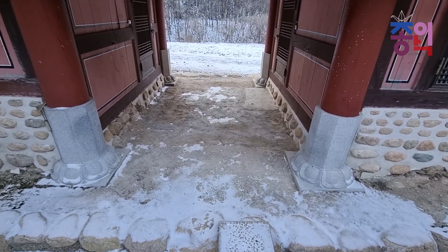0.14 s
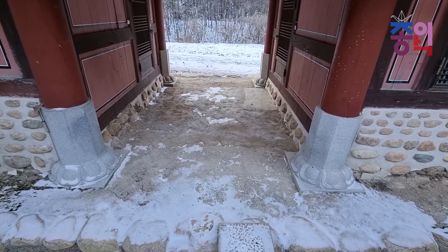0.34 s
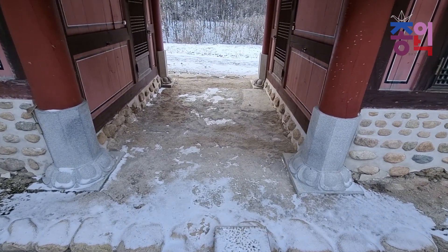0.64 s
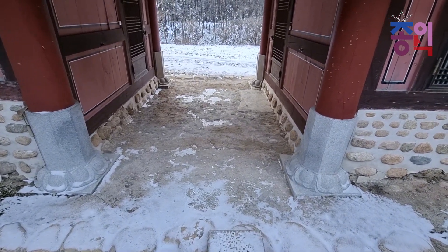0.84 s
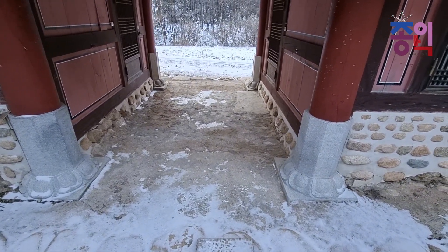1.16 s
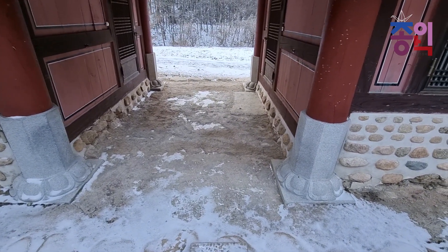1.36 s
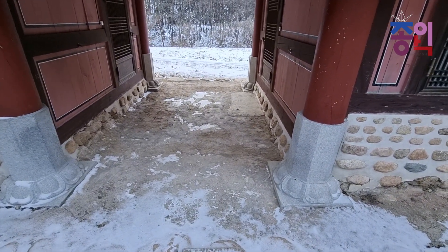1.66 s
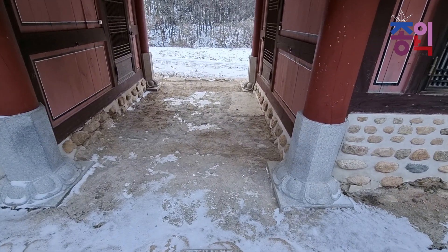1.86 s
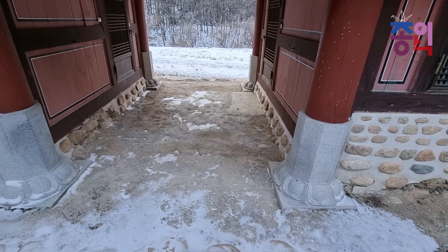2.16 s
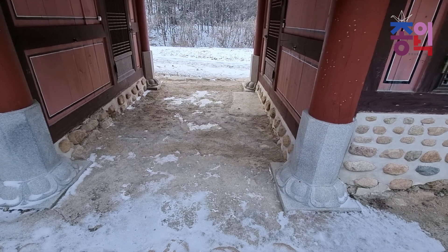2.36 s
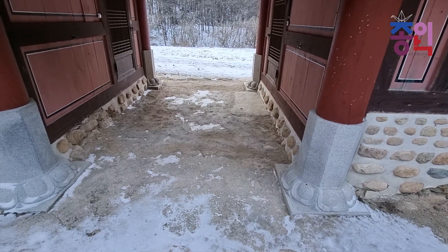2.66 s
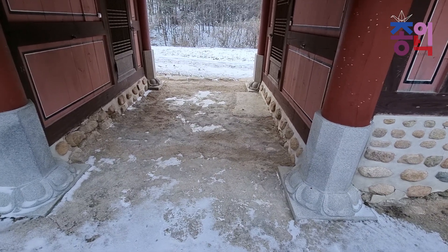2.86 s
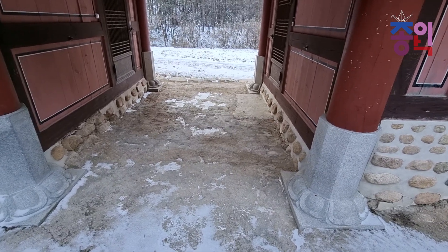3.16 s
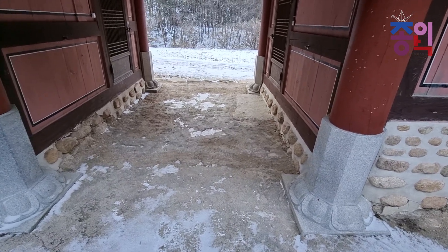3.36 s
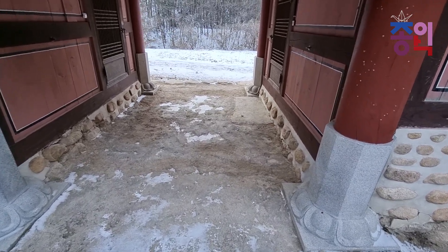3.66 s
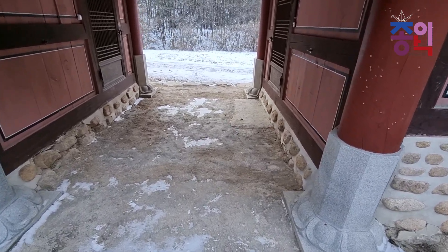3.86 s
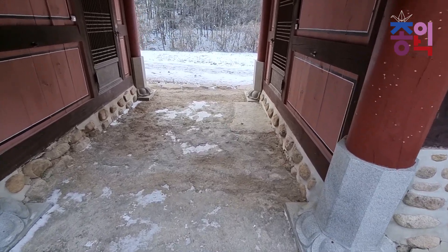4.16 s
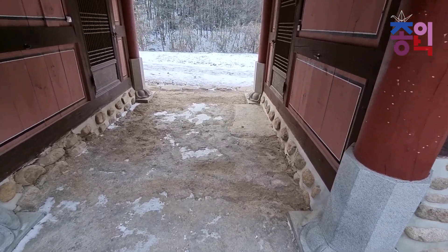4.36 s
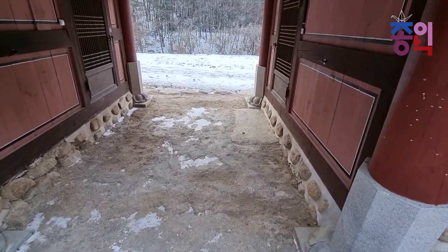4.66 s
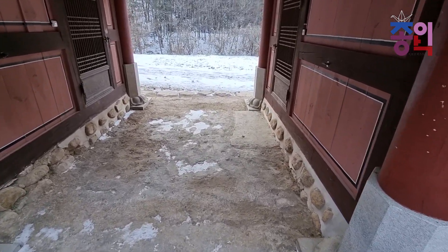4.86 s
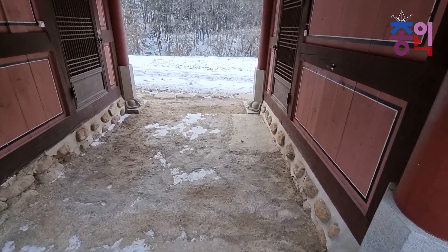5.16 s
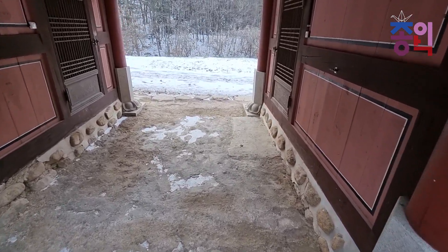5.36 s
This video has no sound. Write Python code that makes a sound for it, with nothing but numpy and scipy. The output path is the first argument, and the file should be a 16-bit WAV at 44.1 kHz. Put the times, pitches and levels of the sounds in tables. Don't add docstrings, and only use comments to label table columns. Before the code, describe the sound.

Slow boots crunch and crackle on frozen snow, then stamp harder onto hollow-sounding stone, with gritty scuffs and icy ticks.

```python
import sys
import numpy as np
from scipy import signal
from scipy.fft import rfft, irfft, next_fast_len
from scipy.io import wavfile
from scipy.ndimage import uniform_filter1d

SR = 44100
rng = np.random.default_rng(int(sys.argv[2]) if len(sys.argv) > 2 else 0)


def volts_from_db(level):
    exponent = np.asarray(level, float) / 20
    return 10 ** exponent


def wrap_up_sound(samples):
    columns = np.atleast_2d(samples).T
    tamed = np.clip(columns, -1, 1)
    steps = np.round(tamed * 32767).astype(np.int16)
    wavfile.write(sys.argv[1], SR, steps)


N = 242991


def evened(x):
    return x / np.sqrt(np.mean(x ** 2) + 1e-20)


def read(points, hz):
    f, value = np.transpose(points)
    return np.interp(np.log(hz + 1), np.log(f + 1), value)


def add(mix, s, sound):
    part = mix[:, max(round(s * SR), 0):][:, :sound.shape[1]]
    part += sound[:, :part.shape[1]]


def any_phase():
    return 2 * np.pi * rng.random()


def either_side(width):
    return width * (rng.random() - 0.5)


# f/Hz, side minus mid level/dB
STEREO_WIDTH = [(60, -8), (150, -26), (380, -8), (950, 2.5), (2380, -3), (5980, 2.5), (15000, -1)]


def noise(spectrum, size):
    long = next_fast_len(size)
    hz = np.fft.rfftfreq(long, 1 / SR)
    mid, side = rfft(rng.standard_normal((2, long))) * volts_from_db(read(spectrum, hz)) * (hz < 15900)
    side = side * volts_from_db(read(STEREO_WIDTH, hz))
    pair = irfft(np.array([mid + side, mid - side]), long)[:, :size]
    return pair / np.sqrt(np.mean(pair.mean(0) ** 2))


def snap(hz, cycles, lean, phase):
    spread = cycles / hz / 4
    t = np.arange(0, 7 * spread, 1 / SR) - 2.558 * spread
    bell = np.exp(-0.5 * (t / spread / np.where(t > 0, 1.4, 1)) ** 2)
    shift = lean * min(hz / 600, 1) * np.array([[1], [-1]])
    wave = bell * np.cos(2 * np.pi * hz * t + phase + shift)
    return wave - bell * wave.sum(axis=1, keepdims=True) / bell.sum()


def flutter(per_s, spread_db, t60):
    happens = rng.random(N) < per_s / SR
    size = volts_from_db(spread_db * np.minimum(rng.exponential(1, N), 4)) * happens
    power = signal.lfilter([1], [1, -volts_from_db(-120 / t60 / SR)], size ** 2)
    return evened(np.sqrt(power))


def control(rows, offset, rise_db, fall_db, rest_db):
    s, hold, db, extra_db = np.transpose(rows)[:, :, None]
    t = np.arange(0, N + 64, 64) / SR
    early = np.maximum(s - t, 0)
    late = np.maximum(t - s - hold, 0)
    level_db = db + offset * extra_db - rise_db * early - fall_db * late
    power = (volts_from_db(level_db) ** 2).sum(0) + volts_from_db(rest_db) ** 2
    return np.interp(np.arange(N) / SR, t, np.sqrt(power))


def patchy(x, spread_db, size):
    z = signal.stft(x, nperseg=128)[2]
    field = uniform_filter1d(rng.standard_normal(z.shape[1:]), size=2, axis=0)
    field = uniform_filter1d(field, size=size, axis=1)
    out = signal.istft(z * volts_from_db(spread_db * evened(field)), nperseg=128)[1][:, :N]
    return out * np.sqrt(np.mean(x ** 2) / np.mean(out ** 2))


def grains(rows, cycles, trim_db, echo_db):
    out = np.zeros((2, N))
    for s, db, hz in rows:
        add(out, s, volts_from_db(db + trim_db) * snap(hz, cycles, either_side(2.35), any_phase()))
        for _ in range(3):
            after = snap(hz * 1.8 ** either_side(1), cycles, either_side(1.4), any_phase())
            add(out, s + 0.008 * rng.random(), volts_from_db(db + echo_db) * after)
    return out


def rough_ring(turns, smooth):
    wobble = rng.standard_normal((2, 2, len(turns)))
    wobble = uniform_filter1d(uniform_filter1d(wobble, smooth), smooth)
    return evened(wobble[0] * np.cos(turns) + wobble[1] * np.sin(turns))


# f/Hz, level/dB per Hz
AIR_COLOUR = [(20, 8), (70, 8), (256, -22), (317, 17.5), (451, -3), (591, -13), (887, -14), (1230, 0),
              (4610, -8.5), (6560, -22), (8360, -41), (13600, -39), (16000, -34)]


def air():
    return volts_from_db(-70) * noise(AIR_COLOUR, N)


# f/Hz, T60/s
WALL_DECAY = [(150, 0.44), (600, 0.22), (2000, 0.18), (8000, 0.25)]


def walls(x):
    taps = np.zeros((2, SR // 2))
    at = np.arange(200, SR // 2 - 20, 20) + rng.integers(0, 20, (2, (SR // 2 - 201) // 20))
    np.put_along_axis(taps, at, rng.choice([-1., 1.], at.shape), 1)
    hz, t, z = signal.stft(taps, SR, nperseg=256)
    tail = signal.istft(z * volts_from_db(-60 * t / read(WALL_DECAY, hz)[:, None]), SR, nperseg=256)[1]
    x = signal.lfilter(*signal.butter(2, 280, "high", fs=SR), x)
    return signal.fftconvolve(x.mean(0)[None], tail / np.linalg.norm(tail[0]), axes=1)[:, :N]


# f/Hz, level/dB per Hz
RUMBLE_COLOUR = [(25, -52), (70, 3), (98, 8.5), (119, -1), (140, 7.5), (180, -19), (310, -120)]
# t/s of full load, hold/s, crunch level/dB, heft level/dB re crunch
LOADS = [(0.0, 0.017, -44.5, -6.5), (0.2, 0.047, -49, -16.5), (0.44, 0.0082, -60, 2),
         (0.6, 0.14, -64.5, -7), (0.79, 0.16, -48, -18), (0.93, 0.27, -48.5, -10.5),
         (1.24, 0.33, -48.5, -12.5), (1.62, 0.088, -62.5, -9), (1.9, 0.024, -68, 1), (2.04, 0.19, -72, -9),
         (2.23, 0.16, -57.5, -27), (2.51, 0.13, -39.5, -39), (2.67, 0.12, -41.5, -17),
         (2.81, 0.0067, -37, -9), (2.9, 0.041, -37, -24), (3.0, 0.075, -52, 1.5), (3.15, 0.024, -34, -8.5),
         (3.29, 0.063, -45, -27), (3.335, 0.091, -32, -8.5), (3.5, 0.15, -45.5, -24),
         (3.69, 0.018, -38.5, -15), (3.775, 0.026, -32, -13.5), (4.2, 0.058, -45.5, -30),
         (4.31, 0.007, -37.5, -13), (4.375, 0.31, -44, -26), (4.545, 0.0094, -34, -35),
         (4.97, 0.18, -48, -33), (5.16, 0.026, -41, -38), (5.49, 0.018, -47, -44)]


def weight():
    heft = control(LOADS, 1, rise_db=480, fall_db=220, rest_db=-99)
    return volts_from_db(-3.5) * heft * noise(RUMBLE_COLOUR, N)


# t/s, level/dB
SLAB_BLOWS = [(3.401, -35), (3.763, -35), (4.179, -44.5), (4.253, -35.5), (4.315, -31.5), (4.369, -35.5),
              (4.481, -31.5), (4.546, -31), (4.579, -34), (4.624, -29.5), (4.7, -46), (4.826, -39),
              (4.972, -38), (5.018, -37.5), (5.14, -32), (5.234, -42.5), (5.438, -58), (5.49, -48)]
# t/s, f/Hz
SLAB_PITCH = [(3.3, 175), (4.2, 173.5), (4.44, 173), (4.48, 176.5), (4.97, 177), (5.1, 175), (5.2, 176.5)]


def slab():
    t60, choke_s, attack_s = 0.43, 0.013, 0.0051
    t, swing = np.arange(N) / SR, np.zeros(N, complex)
    for s, db in SLAB_BLOWS:
        at = round(s * SR)
        since = t[at:] - t[at]
        ring = volts_from_db(db - 60 * since / t60) * (1 - np.exp(-since / attack_s))
        swing[at:] = swing[at:] * np.exp(-since / choke_s) + ring * np.exp(1j * any_phase())
    drift = 1 + 0.004 * evened(uniform_filter1d(rng.standard_normal(N), 3000))
    swing *= volts_from_db(2.0 * evened(uniform_filter1d(rng.standard_normal(N), 600)))
    turns = np.cumsum(np.interp(t, *np.transpose(SLAB_PITCH)) * drift) / SR
    return (swing * np.exp(2j * np.pi * turns)).real * volts_from_db([[0.7], [-0.7]])


# t/s, peak level/dB, f/Hz
FALLING_CRUMBS = [(0.394, -55, 1200), (0.428, -48, 87), (0.775, -53, 106), (0.915, -53, 115),
                  (0.435, -29, 1270), (0.438, -40.5, 2600), (0.566, -49, 4700), (0.629, -49, 1300),
                  (0.654, -48, 695), (0.783, -27.5, 564), (0.809, -45, 900), (0.881, -46, 4200),
                  (0.918, -39, 526), (0.979, -37, 484), (1.011, -36, 490), (1.078, -36, 1330),
                  (1.146, -36, 1110), (1.314, -33.5, 1170), (1.353, -34, 1100), (1.384, -37, 1310),
                  (1.438, -40, 895), (1.475, -33, 825), (1.498, -36, 1420), (1.541, -31, 2250),
                  (1.58, -51, 905), (1.594, -50.5, 105), (1.597, -31.5, 1150), (1.638, -46, 685),
                  (1.704, -44, 640), (1.766, -39, 1970), (1.803, -49, 1700), (1.892, -37.5, 546),
                  (1.936, -61, 3600), (2.012, -44, 1510), (2.94, -42.5, 87.6), (4.213, -35, 1270),
                  (4.434, -37, 1900), (4.478, -30, 1270), (4.48, -35, 3300), (4.547, -24, 890),
                  (4.826, -38, 1480), (4.957, -56, 2200), (4.971, -35.5, 1380)]


def crumbs():
    return grains(FALLING_CRUMBS, cycles=2.46, trim_db=-2.4, echo_db=-7.5)


# t/s, peak level/dB, f/Hz
ICE_SPLINTERS = [(4.07, -54, 1610), (4.114, -48, 1120), (4.151, -41, 690), (4.957, -34, 5830),
                 (2.5032, -40.5, 3040), (2.538, -35, 2000), (2.5502, -34.5, 1940), (2.5645, -31, 2800),
                 (2.5864, -33.5, 2700), (2.7206, -38, 2010), (0.432, -41, 2980), (2.8963, -35, 3100),
                 (2.939, -46, 2770), (3.0124, -42, 2180), (3.0386, -44, 2140), (3.139, -37, 2480),
                 (3.1564, -35, 2800), (3.3483, -35, 3070), (3.3704, -33, 2030), (3.407, -26.5, 3400),
                 (4.393, -32, 1440), (3.477, -35, 3000), (3.5249, -38.5, 3080), (3.5396, -44, 2110),
                 (3.6067, -48, 2070), (3.6401, -53, 2240), (3.69, -36, 2010), (3.7519, -33, 2510),
                 (3.7784, -28.5, 3560), (3.7907, -30, 2210), (3.818, -26, 2300), (4.158, -46, 2620),
                 (4.384, -31, 1350), (4.287, -39, 5660), (4.3101, -40, 2540), (4.4793, -40, 1830),
                 (4.5356, -29.5, 2120), (4.579, -33.5, 3420), (4.58, -27.5, 2630), (4.5994, -42, 2340)]


def splinters():
    return grains(ICE_SPLINTERS, cycles=3.66, trim_db=0.25, echo_db=-13)


# t/s, peak level/dB, f/Hz
LONE_GRAINS = [(4.476, -25, 290), (4.58, -38, 342), (1.172, -49, 510), (1.192, -47, 394), (1.22, -44, 385),
               (2.503, -34, 392), (2.55, -27.5, 1110), (2.565, -28.5, 603), (2.574, -27.5, 845),
               (2.586, -29, 740), (2.642, -36, 494), (2.79, -29, 530), (2.797, -35, 400),
               (2.807, -31.5, 347), (2.818, -31.5, 227), (2.87, -33, 690), (2.916, -31, 450),
               (2.935, -33, 364), (3.058, -51, 353), (3.141, -29, 510), (3.174, -34, 383),
               (3.311, -31, 334), (3.347, -23, 586), (3.358, -26, 597), (3.371, -28.5, 357),
               (3.396, -38, 535), (3.405, -22.5, 930), (3.415, -29, 450), (3.431, -46, 710),
               (3.545, -30, 820), (3.592, -30, 794), (3.622, -33, 1000), (3.66, -27.5, 620),
               (3.666, -30, 1150), (3.692, -20.5, 1070), (3.711, -23.5, 703), (3.77, -16, 780),
               (3.776, -23, 960), (3.781, -37, 1040), (3.807, -31.5, 560), (4.346, -50, 1060),
               (4.503, -33, 620), (4.566, -31, 1290), (4.62, -21.5, 990), (4.918, -39, 781),
               (5.03, -32, 980), (5.042, -39, 900), (5.062, -38, 547), (5.096, -51, 745), (5.153, -39, 770),
               (5.176, -36.5, 670), (5.196, -35, 1240), (5.308, -46, 610), (5.361, -45, 580)]


def lone_grains():
    return grains(LONE_GRAINS, cycles=2.136, trim_db=0.5, echo_db=-15)


# t/s, level/dB
HEEL_CREAKS = [
    (0.002, -39),
    (0.01, -51),
    (0.0205, -38),
    (0.033, -36),
]


def creaks():
    out = np.zeros((2, N))
    for s, db in HEEL_CREAKS:
        for k in range(1, 5):
            add(out, s, volts_from_db(db - 4.1 * k) * snap(k * 1090, k * 5.7, 0, 0))
    return out


# t/s, level/dB, squeak f/Hz
SOLE_DRAGS = [
    [(3.8, -47, 2267), (3.824, -43, 2236), (3.88, -33.5, 2270)],
    [(4.03, -48, 3320), (4.07, -50, 3390), (4.18, -53, 2570)],
    [(4.76, -61, 2367), (4.828, -47, 2270), (4.89, -41, 2185)],
]


def drags():
    out = np.zeros((2, N))
    for rows in SOLE_DRAGS:
        s, db, hz = np.transpose(rows)
        t = np.arange(s[0], s[-1], 1 / SR)
        turns = 2 * np.pi * np.cumsum(np.interp(t, s, hz)) / SR
        sing = rough_ring(turns, smooth=40) * signal.windows.tukey(len(t), 0.4)
        add(out, s[0], volts_from_db(np.interp(t, s, db) - 8.0) * sing)
    return out


# f/Hz, level/dB per Hz
GRIT_COLOUR = [(90, -29.5), (260, -3.5), (880, -4.5), (1350, -3), (2150, -4.5), (2950, -7), (3740, -7.5),
               (4350, -12), (6940, -10.5), (8460, -23.5), (10000, -26), (13000, -44), (22000, -120)]
# f/Hz, level/dB per Hz
ICE_COLOUR = [(3500, -30), (7200, -9), (8600, -14), (10500, -12), (12000, -2.5), (15600, .5)]
# t/s, peak level/dB, ring f/Hz, fizz level/dB re peak, T60/s
SKIDDING_CHIPS = [(0.01, -44, 2270, -34, 0.035), (0.0216, -41, 2145, -43, 0.062),
                  (0.034, -58, 2220, -40, 0.15), (2.4937, -58, 2970, -17, .08),
                  (2.655, -64, 2940, -20, 0.092), (2.808, -53, 2220, -5, 0.12),
                  (2.9266, -48.5, 4680, -26, 0.093), (3.155, -47.5, 2780, -18, .05),
                  (3.331, -49, 2910, 0, 0.3), (3.476, -54, 2900, -36, .06), (4.004, -52.5, 7330, -24, 0.24),
                  (4.013, -45.5, 4450, 3, 0.13), (4.013, -53, 3330, 5.5, 0.21),
                  (4.2138, -51.5, 6640, -8, 0.024), (4.077, -63, 1730, -7, .1),
                  (4.367, -42, 2050, -9, 0.14), (4.959, -53.5, 2950, 9, 0.14),
                  (5.4852, -39.5, 3740, -18, 0.044)]


def chips():
    out, t = np.zeros((2, N)), np.arange(3000) / SR
    grit, ice = noise(GRIT_COLOUR, N), noise(ICE_COLOUR, N)
    for s, db, hz, fizz_db, t60 in SKIDDING_CHIPS:
        ring = rough_ring(2 * np.pi * hz * t, smooth=80)
        start = int(s * 0.9 * SR)
        part = slice(start, start + len(t))
        scrape = (0.052 + 1.4 * np.exp(-t / 0.00032)) * grit[:, part]
        spit = 1.5 * ring + scrape + volts_from_db(fizz_db) * ice[:, part]
        add(out, s, volts_from_db(db - 1.5 - 60 * t / t60) * np.minimum(t / 0.00017, 1) * spit)
    return out


# t/s of full slip, hold/s, grit level/dB, ice hiss level/dB re grit
SOLE_SLIPS = [(0.0, 0.01, -58.5, -34), (0.23, 0.013, -65.5, -13), (0.64, 0.058, -59.5, -17.5),
              (0.85, 0.2, -64.5, -12), (1.1, 0.21, -61.5, -17), (1.35, 0.26, -60.5, -16.5),
              (2.51, 0.098, -47, -7), (2.67, 0.17, -51.5, -7.5), (2.9, 0.0029, -48, -7.5),
              (3.03, 0.039, -61.5, -11), (3.15, 0.0057, -53, -10.5), (3.335, 0.1, -48, -10),
              (3.5, 0.18, -61, -7), (3.69, 0.0028, -47, -11.5), (3.775, 0.052, -44, -9.5),
              (3.84, 0.018, -55, 6.5), (4.035, 0.075, -57.5, 2), (4.12, 0.047, -54, -4.5),
              (4.31, 0.0059, -49, -2.5), (4.37, 0.15, -55, -4), (4.53, 0.005, -48, -5),
              (4.59, 0.023, -47, -4), (4.8, 0.047, -47, -13), (4.965, 0.071, -57, -4.5),
              (5.165, 0.08, -61, -32), (5.48, 0.021, -52, -21)]


def scuff():
    slips = flutter(420, 3.6, t60=0.02)
    grit = control(SOLE_SLIPS, 0, rise_db=396, fall_db=168, rest_db=-70)
    grit = grit * evened(1.4 + slips) * patchy(noise(GRIT_COLOUR, N), 2.6, size=12)
    ice = control(SOLE_SLIPS, 1, rise_db=400, fall_db=133, rest_db=-85.5)
    ice = ice * evened(0.24 + 0.5 * slips + flutter(58, 6.5, t60=0.097)) * noise(ICE_COLOUR, N)
    return volts_from_db(0.5) * grit + ice


# f/Hz, level/dB
CRUNCH_COLOUR = [(88, -37), (150, -20), (274, 0.5), (322, 6), (441, -8.5), (581, 1.5), (1190, -5.5),
                 (1600, -19.5), (3000, -21), (3900, -55), (6600, -120)]


def crunch(count=24):
    out = np.zeros((2, N))
    clumps = evened(0.59 + flutter(70, 2.1, t60=0.035))
    for hz, lean in zip(np.geomspace(190, 3000, count), rng.uniform(-1.36, 1, count)):
        happens = rng.random(N) < 0.2 * hz * clumps / SR
        size = volts_from_db(2.3 * np.minimum(rng.exponential(1, N), 4)) * happens
        train = size * rng.choice([-1, 1], N)
        grain = volts_from_db(read(CRUNCH_COLOUR, hz)) * np.sqrt(hz) * snap(hz, 2.207, 0.86 * lean, 0)
        out += signal.oaconvolve(train[None], grain, axes=1)[:, :N]
    blur = 0.53 * clumps * noise(CRUNCH_COLOUR, N)
    load = control(LOADS, 0, rise_db=450, fall_db=305, rest_db=-66.5)
    return volts_from_db(-3.5) * load * (evened(out) + blur)


# t/s, peak level/dB, f/Hz
LIFT_BREAKS = [
    (0.011, -39.5, 1140),
    (0.032, -38.5, 350),
    (0.218, -40.5, 690),
    (0.237, -48, 322),
    (0.271, -46.5, 497),
    (0.571, -45.5, 664),
]
# t/s, peak level/dB, f/Hz
ROLL_BREAKS = [
    (0.879, -37.5, 534),
    (0.925, -33.5, 433),
    (0.947, -34, 1260),
    (0.995, -33, 1160),
    (1.046, -31, 1200),
    (1.079, -39, 336),
    (1.116, -37, 1100),
    (1.143, -34.5, 560),
    (1.247, -36, 656),
]
# t/s, peak level/dB, f/Hz
LEAN_BREAKS = [
    (1.268, -32.5, 535),
    (1.313, -36, 533),
    (1.351, -37.5, 504),
    (1.383, -39, 544),
    (1.419, -37, 1370),
    (1.473, -33, 800),
    (1.496, -62, 780),
    (1.563, -35, 1090),
    (1.601, -36.5, 780),
    (1.89, -29.5, 1170),
]
# t/s, peak level/dB, f/Hz
TICK_BREAKS = [(1.688, -43, 1070), (1.717, -40.5, 1220), (1.735, -40, 1060), (1.747, -43, 1450),
               (1.765, -38.5, 900), (2.01, -41, 657), (2.094, -37.5, 1160), (2.128, -43.5, 1500),
               (2.164, -43, 1390), (2.184, -43.5, 710), (2.22, -29.5, 1300), (2.246, -37, 1310),
               (2.265, -36, 1300), (2.281, -56, 1200), (2.305, -39, 1280), (2.339, -31, 1420),
               (2.363, -35, 884), (2.521, -26.5, 587), (2.538, -27, 493)]
# t/s, peak level/dB, f/Hz
SINK_BREAKS = [(2.618, -28, 765), (2.685, -28, 870), (2.72, -28, 770), (2.755, -24, 483),
               (2.882, -29.5, 735), (2.895, -23, 560), (2.969, -33, 493), (3.01, -36, 480),
               (3.04, -28.5, 650), (3.09, -28.5, 606), (3.129, -26.5, 640), (3.157, -24, 424),
               (3.199, -31, 437)]
# t/s, peak level/dB, f/Hz
STAMP_BREAKS = [(3.29, -31, 450), (3.322, -27, 585), (3.338, -19, 653), (3.506, -30, 650),
                (3.538, -25.5, 670), (3.569, -25, 1000), (3.606, -23.5, 920), (3.676, -18.5, 1045),
                (3.7, -19.5, 990), (3.765, -8, 987), (3.796, -23, 760), (3.831, -23, 910)]
# t/s, peak level/dB, f/Hz
SLAB_BREAKS = [(4.011, -41.5, 600), (4.09, -43.5, 610), (4.174, -32.5, 593), (4.212, -29.5, 740),
               (4.251, -23.5, 1360), (4.3, -23.5, 786), (4.309, -18, 1100), (4.366, -12, 1180),
               (4.433, -29, 800), (4.546, -33, 594), (4.535, -33, 600), (4.619, -19, 610),
               (4.7, -38.5, 800)]
# t/s, peak level/dB, f/Hz
SETTLE_BREAKS = [
    (4.825, -33.5, 570),
    (4.971, -32.5, 653),
    (5.017, -37, 785),
    (5.13, -39, 1300),
    (5.267, -42, 580),
    (5.485, -27, 1010),
]
# t/s, peak level/dB, f/Hz
SNAP_BREAKS = [
    (0.431, -34, 1310),
    (0.78, -30, 1250),
    (1.539, -27, 1200),
    (2.041, -36.5, 1250),
    (4.476, -24, 1580),
    (4.579, -27, 1540),
    (5.437, -32.5, 1400),
]
# breaks, thud level/dB re peak, sharp edge level/dB re peak
STAGE_SOUND = [(LIFT_BREAKS, -21.5, -4), (ROLL_BREAKS, -15, -17), (LEAN_BREAKS, -9, -15),
               (TICK_BREAKS, -24.5, -41), (SINK_BREAKS, -8.5, -10), (STAMP_BREAKS, -10, -15),
               (SLAB_BREAKS, -14.5, -11), (SETTLE_BREAKS, -12.5, -10.5), (SNAP_BREAKS, -15, -7.5)]


def crack(db, hz, thud_db, edge_db, puffs):
    stronger_db = db + 32
    octaves = np.log2(hz / 700)
    thud_db = thud_db - 0.38 * stronger_db - 5.5 * octaves
    edge_db = edge_db - 0.048 * stronger_db + 2 * octaves
    t = np.arange(2600) / SR
    one = np.zeros((2, len(t)))
    add(one, 0.001, snap(hz, 2.4, either_side(1.1), either_side(0.61)))
    body = snap(720 * (1100 / hz) ** 0.32, 1.274, either_side(1), any_phase())
    add(one, 0.002, volts_from_db(-5.0 - 0.087 * stronger_db) * body)
    edge_lean = either_side(1.5)
    for _ in range(4):
        click = snap(1500 + 2200 * rng.random(), 1.31, edge_lean, any_phase())
        add(one, 0.001268 + 0.0065 * rng.random(), volts_from_db(edge_db - 4.0) * click)
    for when, pitch, size, lean in rng.random((16, 4)):
        shard_hz = np.clip(hz * 4.0 ** (pitch - 0.4), 250, 3000)
        shard = snap(shard_hz, 2.01, 2.36 * (lean - 0.5), 2 * np.pi * size)
        shard_db = -8.5 - 10.5 * size - 18.0 * when - 0.26 * stronger_db
        add(one, 0.001976 + 0.031 * when ** 1.7, volts_from_db(shard_db) * shard)
    add(one, 0.001, volts_from_db(thud_db) * snap(155 + 45 * rng.random(), 2.625, 0, any_phase()))
    add(one, 0.001, volts_from_db(thud_db + 1.0) * snap(260 + 90 * rng.random(), 1.62, 0, any_phase()))
    start = int(rng.random() * (N - len(t)))
    puff = np.minimum(t / 0.00078, 1) * puffs[:, start:start + len(t)]
    one += volts_from_db(edge_db - 13.5 - 60 * t / 0.053) * puff
    return volts_from_db(db) * one


def cracks():
    out = np.zeros((2, N))
    puffs = noise(GRIT_COLOUR, N) + 0.041 * noise(ICE_COLOUR, N)
    for rows, thud_db, edge_db in STAGE_SOUND:
        for s, db, hz in rows:
            add(out, s, crack(db, hz, thud_db, edge_db, puffs))
    return out


def scene():
    boots = splinters() + lone_grains() + creaks() + drags() + chips() + scuff() + crunch() + cracks()
    return air() + volts_from_db(-5.0) * walls(boots) + weight() + slab() + crumbs() + boots


def band_limit(x):
    return signal.sosfilt(signal.butter(12, 16770, fs=SR, output="sos"), x)


# f/Hz, left minus right level/dB
PORT_BALANCE = [(60, -0.5), (180, 1), (550, -0.5), (1650, 1), (4970, 3), (15000, -1.0)]


def record(dry):
    hz = np.fft.rfftfreq(N, 1 / SR)
    ports = volts_from_db(read(PORT_BALANCE, hz) * np.array([[0.5], [-0.5]]))
    ports = ports * hz ** 2 / (hz ** 2 + 45 ** 2)
    ports = ports / (1 + (hz / 16000) ** 120)
    return band_limit(irfft(rfft(dry) * ports, N))


dry = scene()
out = record(dry)
wrap_up_sound(out)
```